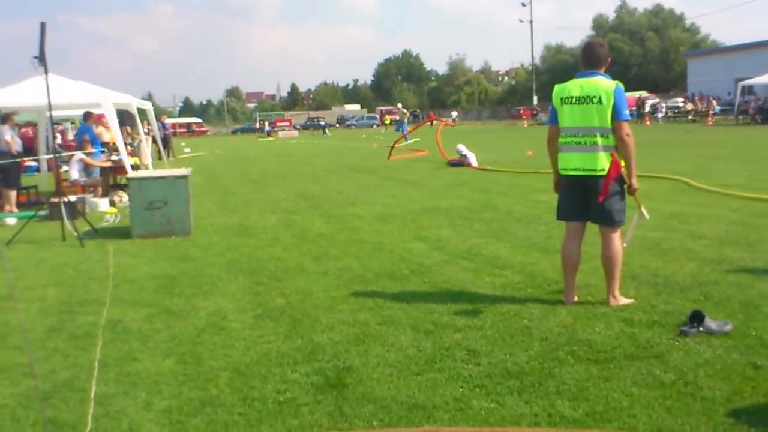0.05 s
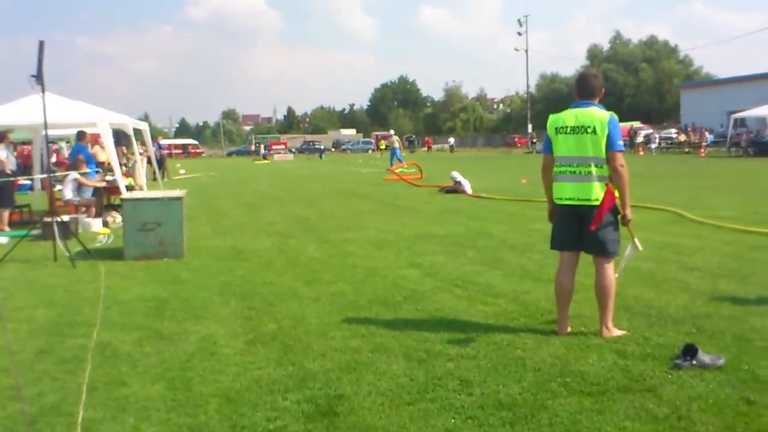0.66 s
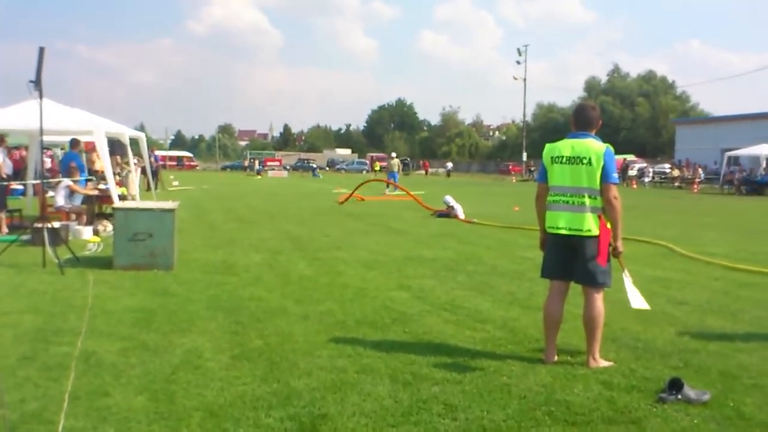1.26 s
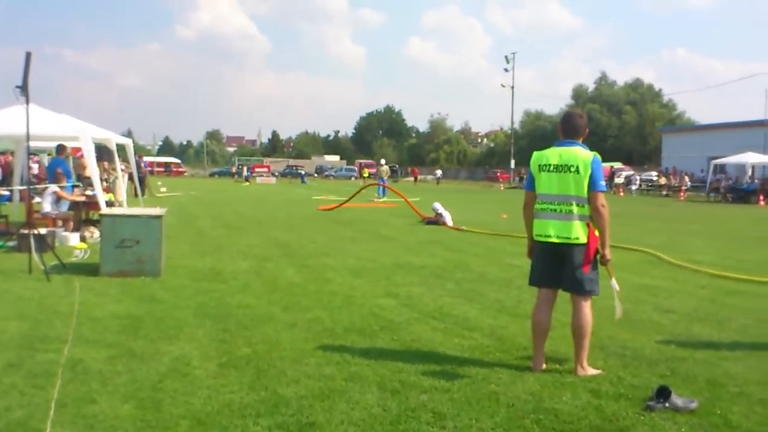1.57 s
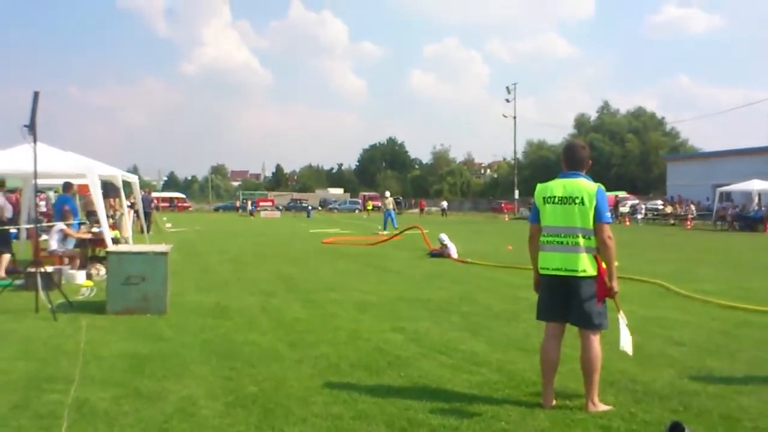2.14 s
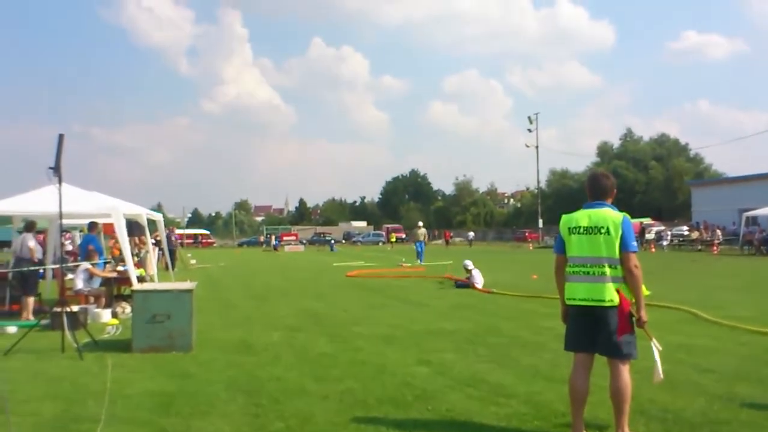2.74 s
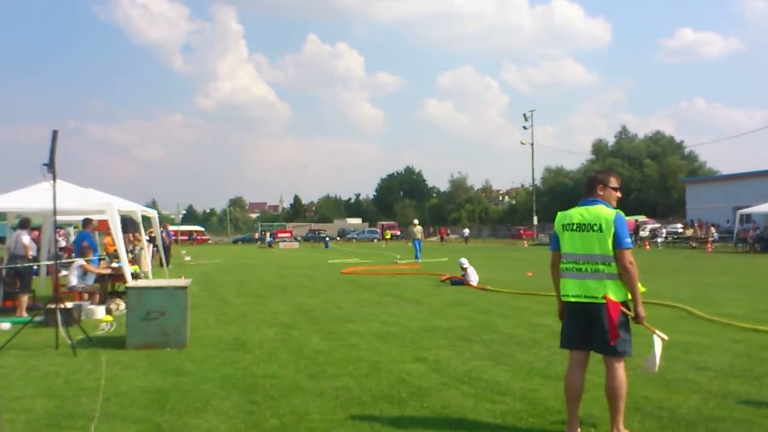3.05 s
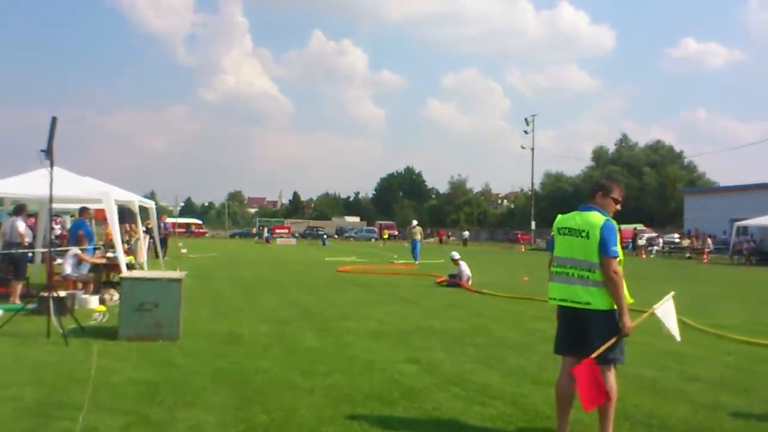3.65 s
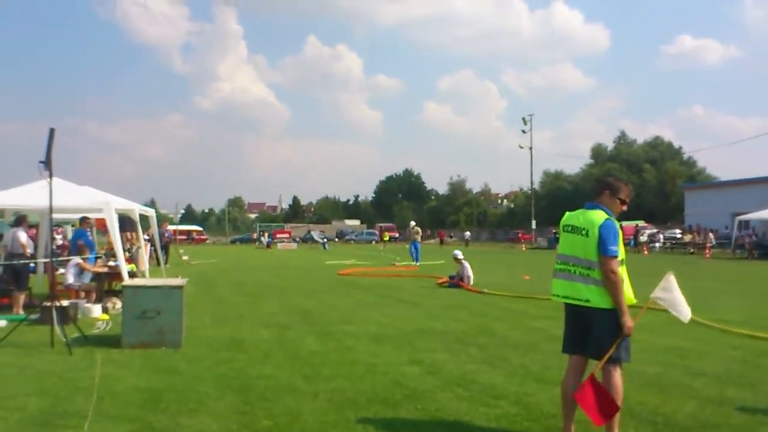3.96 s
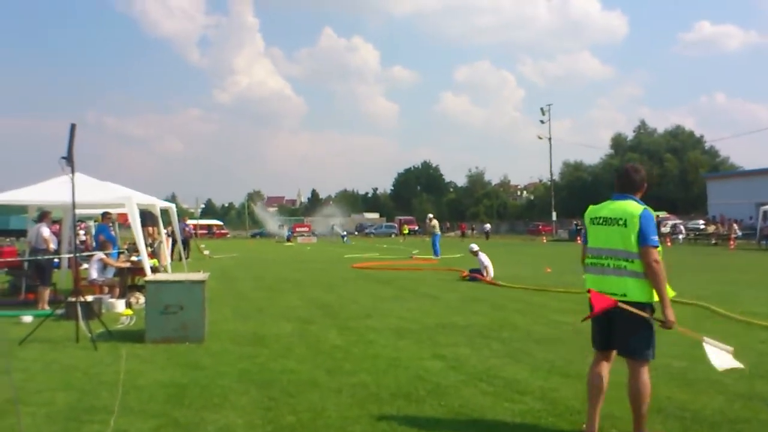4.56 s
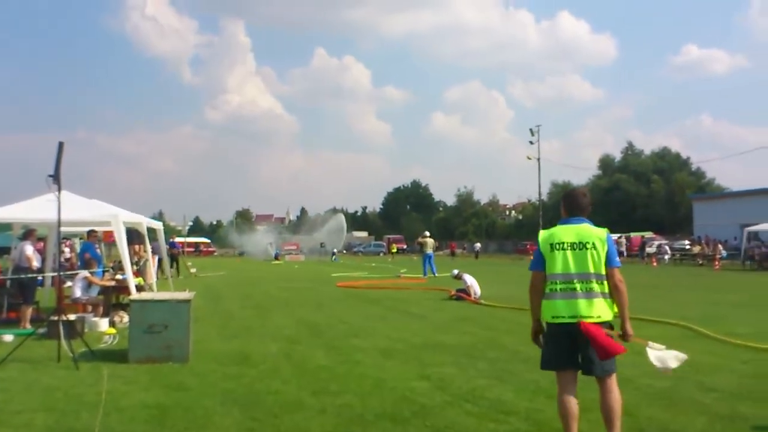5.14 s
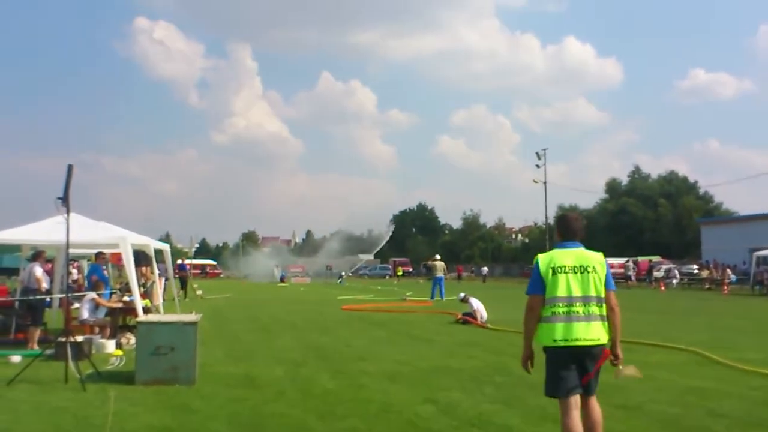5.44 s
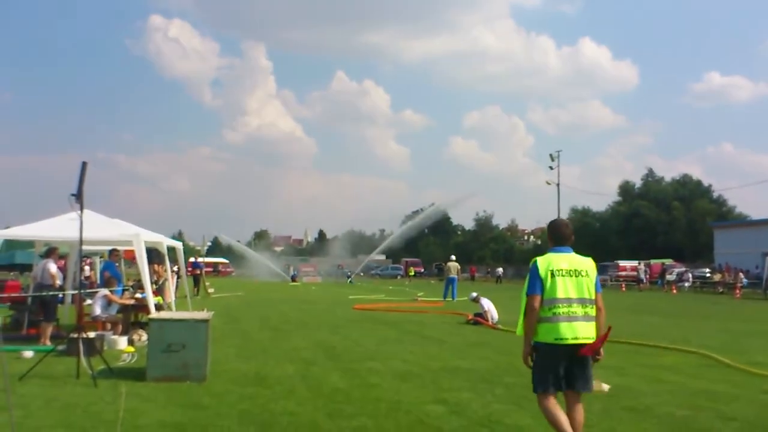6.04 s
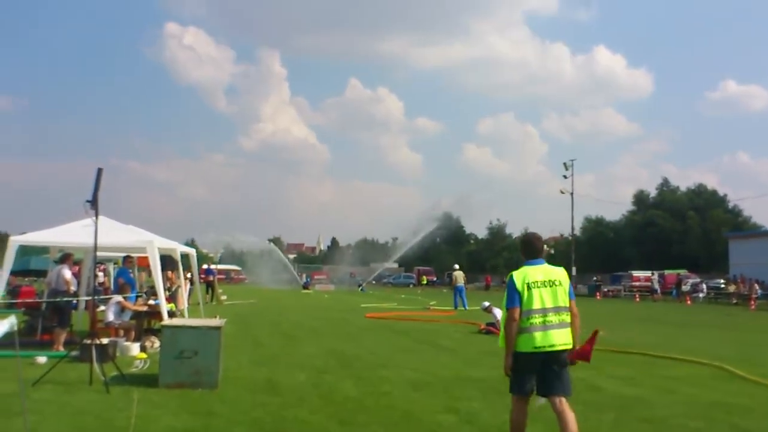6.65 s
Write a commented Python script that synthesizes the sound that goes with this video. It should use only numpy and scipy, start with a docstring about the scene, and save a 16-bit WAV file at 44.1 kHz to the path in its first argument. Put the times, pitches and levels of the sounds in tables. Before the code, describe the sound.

A portable fire pump engine runs flat out on an open grass field. Its exhaust makes a loud, booming buzz, with fast metallic clatter and a thin hiss behind it. The pitch creeps upward, climbs more clearly past the middle, then sags near the end as the sound weakens. The microphone is close and overloads slightly on the peaks.

```python
"""The exhaust of a four-cylinder four-stroke engine booms as it drives a portable fire pump flat out.
Each firing sends a pressure pulse and a burst of turbulent gas through a short, resonant pipe.
Behind it, impacts of pistons, valves and tin covers excite the metal, all timed by one crankshaft.
The engine speeds up as the load changes, then sags, and the sound slowly grows weaker.
Its peaks overload a close two-port microphone."""
import sys
import numpy as np
from scipy import signal
from scipy.fft import rfft, irfft
from scipy.io import wavfile
from scipy.ndimage import uniform_filter1d

SR = 44100
rng = np.random.default_rng(int(sys.argv[2]) if len(sys.argv) > 2 else 0)


def transcribe(u):
    """Save the signal u as a 16-bit wav file named by the first command-line argument.

    u: samples, shape (n,) or (channels, n), limited to [-1, 1]; the rate is SR.
    q: integer samples, one column per channel.
    """
    v = np.clip(np.atleast_2d(u).T, -1, 1)
    q = np.round(v * 32767).astype(np.int16)
    wavfile.write(sys.argv[1], SR, q)


N = 299880
TIME_S = np.arange(N) / SR
BIN_HZ = np.maximum(np.arange(N // 2 + 1) * SR / N, 1)


def from_db(db):
    """Amplitude ratio of a level in decibels."""
    return 10 ** (np.asarray(db) / 20)


def unit_rms(x):
    """Normalisation to unit mean power."""
    return x / np.sqrt(np.mean(x ** 2) + 1e-20)


def in_time(rows):
    """Linear interpolation of a curve at every sample."""
    return np.interp(TIME_S, *np.transpose(rows))


def in_frequency(rows):
    """Interpolation of each column of a spectrum over log frequency."""
    hz, *columns = np.transpose(rows)
    return [np.interp(np.log(BIN_HZ), np.log(hz), column) for column in columns]


def resonance_db(modes, hz):
    """Lorentzian peaks and notches, summed in decibels."""
    return sum(db / (1 + (2 * (hz - centre_hz) / width_hz) ** 2) for centre_hz, width_hz, db in modes)


def coloured(x, spectrum, modes=()):
    """Minimum-phase filtering: a causal system rings after a pulse, never before."""
    level_db = in_frequency(spectrum)[0] + resonance_db(modes, BIN_HZ)
    cepstrum = irfft(np.log(from_db(level_db)), N)
    cepstrum[1:N // 2] *= 2
    cepstrum[N // 2 + 1:] = 0
    return irfft(rfft(x) * np.exp(rfft(cepstrum)), N)


def drift(corner_hz):
    """Low-pass noise: a slow random fluctuation of unit spread."""
    knots = np.arange(0, N, 32)
    spectrum = rfft(rng.standard_normal(len(knots)))
    slow = irfft(spectrum / (1 + (BIN_HZ[:len(spectrum)] / corner_hz) ** 2), len(knots))
    return np.interp(np.arange(N), knots, unit_rms(slow))


def impulses(times, sizes):
    """Fractional delay: each impulse is shared between two neighbouring samples."""
    sample, fraction = np.divmod(np.clip(times * SR, 0, N - 2), 1)
    sample = sample.astype(int)
    return np.bincount(sample, sizes * (1 - fraction), N) + np.bincount(sample + 1, sizes * fraction, N)


# Response of the microphone's ports: frequency_hz, left_over_right_db, right_lead_rad, coherence_share
PORT_RESPONSE = [(96, 0.2, 0.24, 0.3), (400, 0.1, 0.58, 1), (920, -2, 1.26, 1), (1230, 0.5, 2.07, 0.63),
                 (1590, -3, 2.1, 1), (2060, -3.5, 2.79, 0.59), (2980, 0.4, 2.71, 1), (3300, 9, 2.24, 0),
                 (3340, -9, 3.7, 0.23), (4010, 8, 6.9, 0.73), (4540, -10, 5.92, 0.84),
                 (5550, -5, 6.2, 0.25), (6660, -3.5, 8.19, 1), (7940, 2, 9.1, 0.89), (8850, 6, 11.4, 0),
                 (9500, 20, 10.9, 0.5), (11100, 17.5, 10.5, 0), (14700, 7, 11, 0.6)]

def ports(direct, scattered=None):
    """Path difference: direct sound reaches the right port first; scattering lowers the coherence."""
    balance_db, lead_rad, coherence = in_frequency(PORT_RESPONSE)
    pair = rfft(direct) * np.exp(0.5j * lead_rad * [[-1], [1]])
    if scattered is not None:
        coherence = np.clip(coherence, 0, 1)
        pair = np.sqrt(coherence) * pair + np.sqrt(1 - coherence) * rfft(scattered)
    gains = from_db(balance_db / 2 * [[1], [-1]])
    return irfft(pair * gains / np.sqrt(np.mean(gains ** 2, axis=0)), N)


# Engine speed: time_s, firing_rate_hz
ENGINE_SPEED = [(0.0, 117.17), (0.2, 117.03), (0.6, 119.47), (0.85, 120.04), (1.05, 121.43), (1.44, 123.0),
                (1.85, 121.92), (2.25, 122.46), (2.6, 123.26), (3.2, 124.51), (3.7, 124.7), (3.95, 125.63),
                (4.03, 124.78), (4.33, 126.6), (4.7, 135.07), (4.82, 136.82), (5.3, 139.34), (5.61, 139.88),
                (5.8, 138.88), (6.28, 137.15), (6.6, 134.6), (6.8, 131.52)]

def crankshaft():
    """Phase is the integral of frequency: `fired` counts firings, two to a turn, with slight wander."""
    firing_hz = in_time(ENGINE_SPEED)
    fired = np.cumsum(firing_hz * (1 + 0.0005 * drift(12))) / SR
    return fired, firing_hz


# Cylinders in firing order: relative_pulse_db, delay_ms, puff_db, crack_db
CYLINDER_BALANCE = [(3, 0.244, 9.5, -43), (15.5, -0.032, 8, -15), (8, -0.057, 8, -38),
                    (16.5, -0.0064, 13.5, -28)]

def firings(fired, scatter_db=0.3, jitter_ms=0.01):
    """Cyclic variation: each firing's time and sizes scatter about those of its cylinder."""
    number = np.arange(1, int(fired[-1]))
    pulse_db, delay_ms, puff_db, crack_db = np.array(CYLINDER_BALANCE)[number % len(CYLINDER_BALANCE)].T
    timing, burning = rng.standard_normal((len(number), 2)).T
    times = np.interp(number, fired, TIME_S) + (delay_ms + jitter_ms * timing) / 1000
    return times, from_db(scatter_db * burning) * from_db([pulse_db, puff_db, crack_db])


def puffs(times, sizes, rise_s, decay_s):
    """Exponential relaxation: gas flow swells as a valve opens, then dies away."""
    rise, decay = np.exp(-1 / (rise_s * SR)), np.exp(-1 / (decay_s * SR))
    poles = np.convolve([1, -rise], [1, -decay])
    return signal.lfilter([1 - rise], poles, impulses(times, sizes) + 1e-18)


def turbulence(spectrum, flow):
    """Turbulent noise follows the flow and reaches the two ports partly coherent."""
    noise = coloured(rng.standard_normal((3, N)) * flow, spectrum)
    return unit_rms(ports(noise[0], noise[1:]))


# Spectrum of turbulence and machine rumble: frequency_hz, relative_density_db
RUMBLE_SPECTRUM = [(20, -16), (45, -16), (110, -4), (280, -2), (480, -4.5), (720, -1), (1100, -2),
                   (1550, 5), (1900, -7.5), (2150, -30.5), (3300, -27.5)]

def rumble(flow):
    """Shallow amplitude modulation: low noise pulses with the flow over a steady floor."""
    return turbulence(RUMBLE_SPECTRUM, flow + 1.2)


# Spectrum of the valve gear's taps: frequency_hz, relative_level_db
CLATTER_SPECTRUM = [(150, -24), (400, -3), (750, -4.5), (1100, -4), (1450, -7), (1750, -5), (1950, -24.5),
                    (2400, 3.5), (2900, -8), (4000, -21.5)]

def valve_clatter(fired, flow, taps_per_cycle=32):
    """Periodic impacts give a line spectrum: valves and gears tap at the same places in every cycle."""
    cycle = len(CYLINDER_BALANCE)
    places = rng.uniform(0, cycle, taps_per_cycle)
    signs = rng.choice([-1, 1], taps_per_cycle)
    starts = np.arange(0, fired[-1] - cycle, cycle)
    times = np.interp((starts[:, None] + places).ravel(), fired, TIME_S)
    taps = impulses(times, np.tile(signs, len(starts))) * flow
    return unit_rms(coloured(taps, CLATTER_SPECTRUM))


# Spectrum of a piston's impact: frequency_hz, relative_level_db
KNOCK_SPECTRUM = [(60, -13), (700, -20), (1050, -6.5), (1300, -8.5), (1650, 0.5), (1900, -11.5),
                  (2600, -17), (3100, -23), (4500, -37), (9000, -48)]
# Modes of the engine block: centre_hz, width_hz, gain_db
BLOCK_RESONANCES = [(1318.4, 39, 16.5), (1544, 41, 11), (2160, 97, 11), (2700, 64, 17)]

def piston_knock(fired, lag_firings=0.2, return_share=0.65, jitter_ms=0.04):
    """Alternating impacts ring the block, mainly at odd multiples of the crank's speed."""
    number = np.arange(1, int(fired[-1]) - 1)
    times = np.interp(number + lag_firings, fired, TIME_S)
    times += jitter_ms / 1000 * rng.standard_normal(len(number))
    impacts = impulses(times, np.where(number % 2, 1, -return_share))
    ringing = coloured(impacts, KNOCK_SPECTRUM, BLOCK_RESONANCES)
    # Dispersion: lower bending waves travel more slowly, which spreads each knock.
    travel_s = 0.012 / np.sqrt(BIN_HZ / BLOCK_RESONANCES[0][0])
    dispersion = np.exp(-2j * np.pi * np.cumsum(travel_s) * SR / N)
    return unit_rms(irfft(rfft(ringing) * dispersion, N))


def cover_rattle(times, low_hz=3850, high_hz=7000, modes=28, width_hz=40, scatter_db=4, swell_db=3.5):
    """Impact excitation: each firing shakes the tin covers, whose damped modes swell independently."""
    pair = np.zeros((2, N))
    radius = np.exp(-np.pi * width_hz / SR)
    modes_hz = np.geomspace(low_hz, high_hz, modes) * rng.uniform(0.99, 1.01, modes)
    for k, hz in enumerate(modes_hz):
        swell, lag, scatter = rng.standard_normal((len(times), 3)).T
        swell = unit_rms(uniform_filter1d(swell, size=40))
        lag_s = 0.002 * np.abs(lag)
        taps = impulses(times + lag_s, from_db(swell_db * swell + scatter_db * scatter))
        poles = [1, -2 * radius * np.cos(2 * np.pi * hz / SR), radius ** 2]
        pair[k % 2] += signal.lfilter([1, 0, -1], poles, taps + 1e-18)
    return unit_rms(ports(pair.sum(axis=0), np.sqrt(2) * pair))


# Thin metallic rings in the hiss: peak_s, length_s, pitch_hz, width_hz, level_over_hiss_db
RING_EVENTS = [(0.15, 0.57, 4170, 70, -14), (0.577, 0.52, 4370, 70, -9), (1.17, 0.65, 4650, 28, -12),
               (1.547, 0.17, 5400, 130, -11), (2.555, 0.25, 4360, 130, -16), (3.752, 0.56, 4680, 130, -10),
               (6.35, 0.93, 4890, 180, -12)]

def metallic_rings(flow, flutter_db=1.8):
    """Narrow-band noise has pitch: breathy rings swell, flutter and sink, pulsing with the flow."""
    rings = 0
    for peak_s, length_s, hz, width_hz, db in RING_EVENTS:
        envelope = from_db(db + flutter_db * drift(25)) * np.exp(-2 * ((TIME_S - peak_s) / length_s) ** 2)
        phase = 2 * np.pi * hz * TIME_S
        rings += envelope * (drift(width_hz) * np.cos(phase) + drift(width_hz) * np.sin(phase))
    return ports(unit_rms(flow) * rings)


# Spectrum of the rushing gas: frequency_hz, relative_density_db
HISS_SPECTRUM = [(1200, -67), (2150, -58), (2650, -56), (3200, -59.5), (3700, -60.5), (4350, -58),
                 (5500, -51.5), (6500, -57.5), (7700, -57), (8700, -56.5), (9700, -53.5), (11500, -61),
                 (15000, -71)]

def gas_hiss(flow, low_hz=3300, high_hz=12000, bands=44, swell_db=1.9, flutter_db=1.7):
    """Jet noise of shifting colour: each narrow band swells and flutters independently."""
    spectrum = rfft(turbulence(HISS_SPECTRUM, flow))
    band_number = np.interp(BIN_HZ, np.geomspace(low_hz, high_hz, bands), np.arange(bands))
    hiss = 0
    for k in range(bands):
        band = irfft(spectrum * np.maximum(1 - np.abs(band_number - k), 0), N)
        hiss += from_db(swell_db * drift(4) + flutter_db * drift(25)) * band
    return unit_rms(hiss)


# Pipe resonances that the gas roars in: frequency_hz, relative_density_db
RASP_SPECTRUM = [(400, -23), (540, 2), (700, 0), (860, 4.5), (1080, -26), (1500, -28), (1900, -18),
                 (2130, 15), (2400, -21), (2800, -16), (3080, -1.5), (3400, -21), (6000, -39)]
# Envelope of the rasp: time_s, level_db
RASP_ENVELOPE = [(0, -41), (1.2, -50), (2.5, -31), (3.4, -26), (4.3, -33), (5.1, -29), (6.4, -32),
                 (6.8, -36)]

def pipe_rasp(flow):
    """Broadband excitation of resonances: gas roars in the pipe, louder after the first seconds."""
    return from_db(in_time(RASP_ENVELOPE)) * turbulence(RASP_SPECTRUM, flow)


# Envelope of the throb: time_s, level_db
THROB_ENVELOPE = [(0, -39), (0.6, -43), (1.3, -36), (2.8, -37.5), (3.6, -41), (4.3, -45), (5, -37),
                  (5.6, -43), (6.8, -42)]

def crank_throb(fired, waver_db=2):
    """A subharmonic at half the firing rate: one throb in each turn of the crank."""
    level_db = in_time(THROB_ENVELOPE) + waver_db * drift(9)
    return np.sqrt(2) * from_db(level_db) * np.cos(np.pi * fired)


# Spectral lines of the growl: multiple_of_firing_rate
GROWL_ORDERS = (2.25, 3.25, 4.25, 4.75, 5.25, 6.25, 7.5)
# Strength of each line at top speed: level_db
GROWL_LEVELS = (-36, -41, -42, -36.5, -41, -39.5, -43)

def growl(fired, firing_hz, unsteady_share=0.43, db_per_hz=0.43):
    """Sidebands: cylinders burn unequally, adding lines between the harmonics that grow with speed."""
    lines = 0
    for order, db in zip(GROWL_ORDERS, GROWL_LEVELS):
        waver = 1 + unsteady_share * (drift(8.1) + 1j * drift(11))
        lines += from_db(db) * np.real(waver * np.exp(2j * np.pi * order * fired))
    return np.sqrt(2) * from_db(db_per_hz * (firing_hz - firing_hz.max())) * lines


# Spectrum of a pulse leaving the pipe: frequency_hz, relative_level_db
PULSE_SPECTRUM = [(25, -4), (70, 0), (130, 7), (200, 8.5), (300, 9.5), (450, 6.5), (670, 14.5), (860, 5.5),
                  (980, -0.5), (1100, -6.5), (1300, 2.5), (1550, -4), (1850, -22), (2600, -19), (3200, -10),
                  (7000, -25)]
# Peaks and notches from exhaust to microphone, for bark and boom: centre_hz, width_hz, gain_db
PATH_RESONANCES = [(202.5, 7.2, 5.5), (277, 27, 4), (353.4, 2.3, 2), (368, 15, -7), (414.2, 21, -9.5),
                   (497.7, 9, -14.5), (524, 18, 2.5), (551.7, 17, -8), (578.4, 11.4, -16), (610, 5.1, -2),
                   (617.4, 12, 4), (650, 15.4, -6.5), (706, 5.1, -1), (725.4, 16.6, 4.5),
                   (946.4, 49, -10.5), (1030, 160, 0.5), (1112, 22, -20.5), (1490, 26, 8)]

def exhaust_bark(fired, firing_hz, times, sizes):
    """Source and filter: unequal pulses ring the pipe, above and between the boom's harmonics."""
    pulses = impulses(times, sizes / np.mean(sizes)) * SR / firing_hz - 1
    for k in range(1, len(BOOM_HARMONICS) + 1):   # the low harmonics belong to the boom
        pulses -= 2 * np.cos(2 * np.pi * k * fired)
    return unit_rms(coloured(-pulses, PULSE_SPECTRUM, PATH_RESONANCES))


# Exhaust harmonics from the firing rate upwards: relative_start_db, slope_db_per_s
BOOM_HARMONICS = [(-13.5, -1.72), (-10, -1.5), (-14, -0.1), (-16, -0.78), (-21.5, 0.17), (-26, -0.13),
                  (-24.5, -0.1), (-16, -3), (-24.5, -2), (-36.5, -1.3), (-30, -3.5)]
# Brief swells and dips of single harmonics: peak_s, length_s, harmonic_number, gain_db
HARMONIC_SWELLS = [(0.1, 0.35, 3, 1), (0.1, 0.35, 4, -2), (0.55, 0.38, 6, 4), (1.25, 0.5, 6, 3),
                   (4.46, 0.25, 2, -2), (4.55, 0.3, 1, 2.5), (5.0, 0.25, 7, -3), (5.5, 0.9, 8, -11),
                   (6.27, 0.25, 4, -11)]

def exhaust_boom(fired, firing_hz, radiation_hz=217, pipe_delay_s=0.00039, ease_at_s=6.35):
    """Fourier series of the firing pulses: speed carries each harmonic through the path's resonances."""
    boom = 0
    easing_s = np.maximum(TIME_S - ease_at_s, 0)
    for k, (start_db, db_per_s) in enumerate(BOOM_HARMONICS, 1):
        level_db = start_db + db_per_s * TIME_S + resonance_db(PATH_RESONANCES, k * firing_hz)
        if k > 1:   # as the engine eases off, the overtones fall faster; the firing note holds
            level_db -= 15 / k ** 0.19 * easing_s
        for peak_s, length_s, harmonic, db in HARMONIC_SWELLS:
            if harmonic == k:
                level_db += db * np.exp(-2 * ((TIME_S - peak_s) / length_s) ** 2)
        level_db += 0.21 * np.sqrt(k) * drift(22)   # uneven burning: higher harmonics waver more
        phase = 2 * np.pi * k * (fired - firing_hz * pipe_delay_s)
        lead_rad = np.arctan(radiation_hz / (k * firing_hz))   # the open end advances the lowest most
        boom -= np.sqrt(2) * from_db(level_db) * np.cos(phase + lead_rad)
    return boom


# Force of the exhaust, which the hiss and the machine noises follow: time_s, relative_level_db
EXHAUST_FORCE = [(0.06, -15), (0.13, -16), (0.92, -15), (1.86, -18), (3.61, -19), (3.79, -18), (6.44, -22),
                 (6.8, -26.5)]

def scene():
    """Superposition: exhaust tones, impacts and gas noise, locked to one crankshaft, add at the ports."""
    fired, firing_hz = crankshaft()
    times, (pulse_sizes, puff_sizes, crack_sizes) = firings(fired)
    flow = 0.5 + puffs(times, puff_sizes, rise_s=0.0045, decay_s=0.0014)
    sharp_flow = flow + puffs(times, crack_sizes, rise_s=0.00023, decay_s=0.0021)

    force_db = in_time(EXHAUST_FORCE)
    bark_db = 0.82 * force_db - 7
    knock_db = bark_db + 0.5 - 0.53 * TIME_S
    clatter_db = bark_db - 0.5 - 1.1 * TIME_S
    rumble_db = bark_db - 0.35 * TIME_S

    engine = from_db(0.57) * exhaust_boom(fired, firing_hz)
    engine += from_db(bark_db) * exhaust_bark(fired, firing_hz, times, pulse_sizes)
    engine += from_db(knock_db) * piston_knock(fired)
    engine += crank_throb(fired) + growl(fired, firing_hz)
    engine += from_db(clatter_db) * valve_clatter(fired, flow)
    treble = gas_hiss(sharp_flow) + metallic_rings(flow) + from_db(-7.5) * cover_rattle(times)
    treble *= from_db(force_db + 1.72 + 0.83 * drift(28))   # the treble flickers
    return ports(engine) + treble + from_db(rumble_db) * rumble(flow) + pipe_rasp(sharp_flow)


def record(dry):
    """Hard clipping: peaks overload the microphone; the offset and the highest treble are removed."""
    overload, stopband_hz = 0.93, 16100
    clipped = np.clip(dry, -overload, overload)
    lowpass = signal.cheby2(20, 60, stopband_hz, fs=SR, output="sos")
    return signal.sosfilt(lowpass, clipped - np.mean(clipped))


dry = scene()
out = record(dry)
transcribe(out)
```